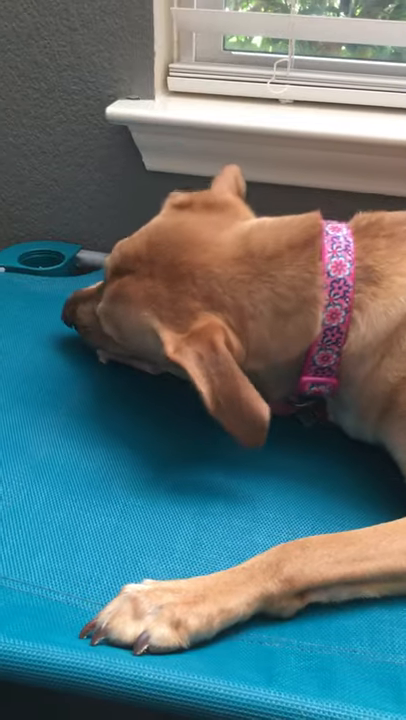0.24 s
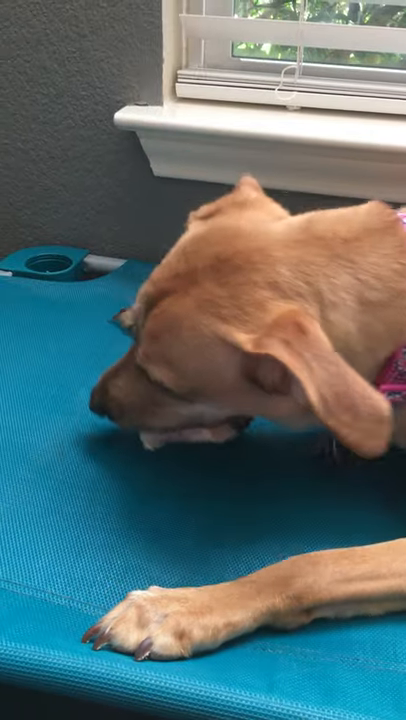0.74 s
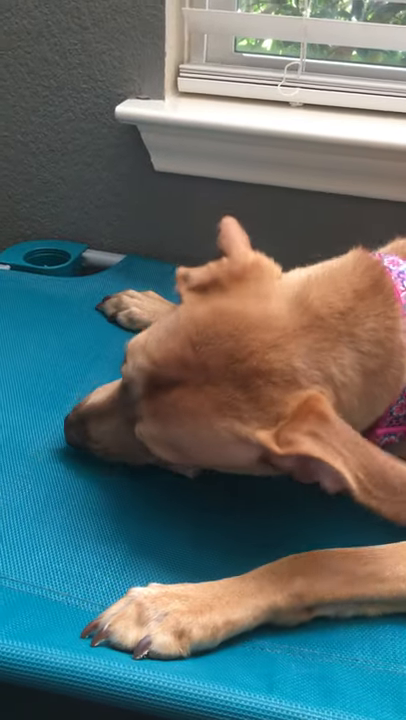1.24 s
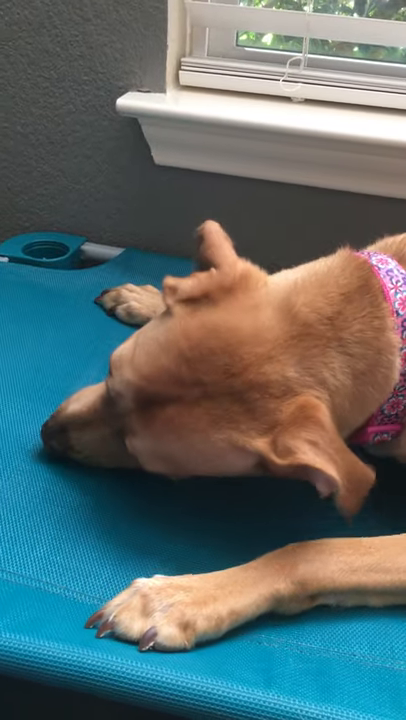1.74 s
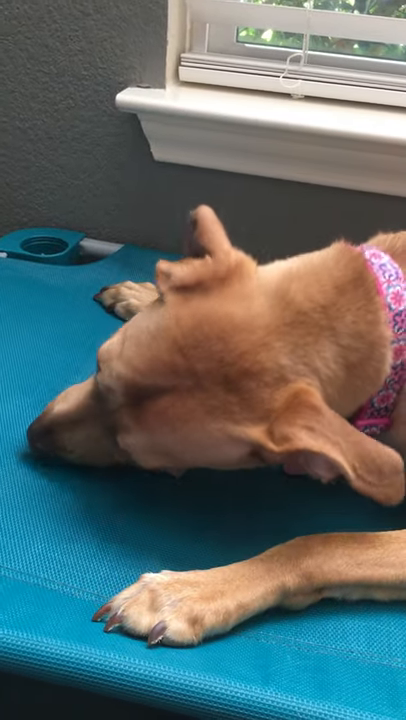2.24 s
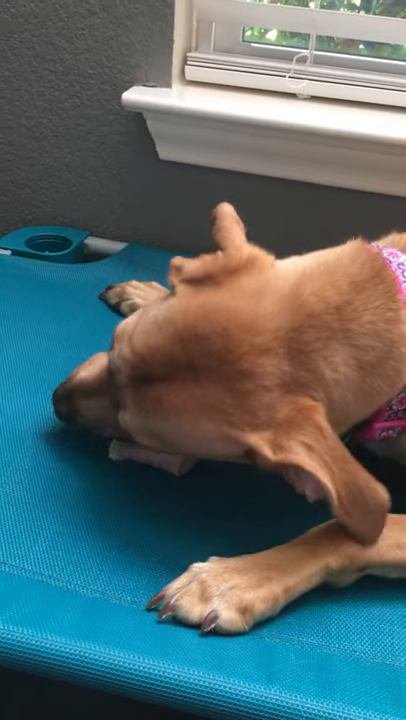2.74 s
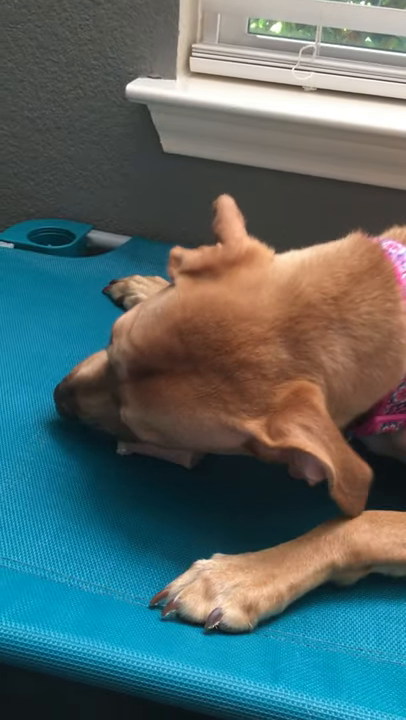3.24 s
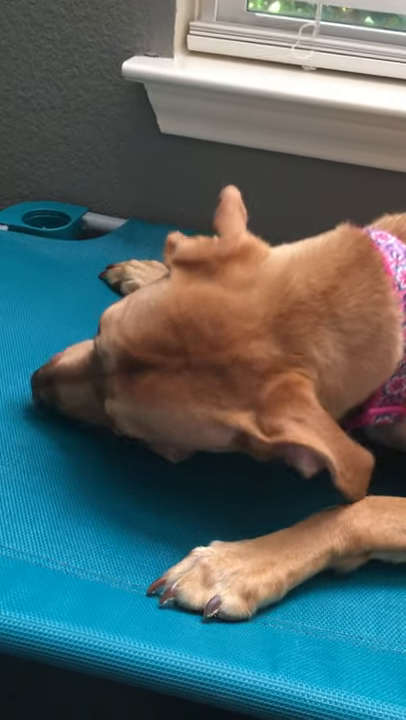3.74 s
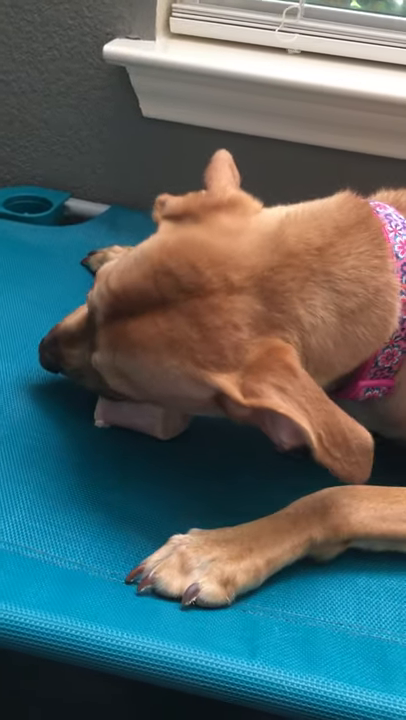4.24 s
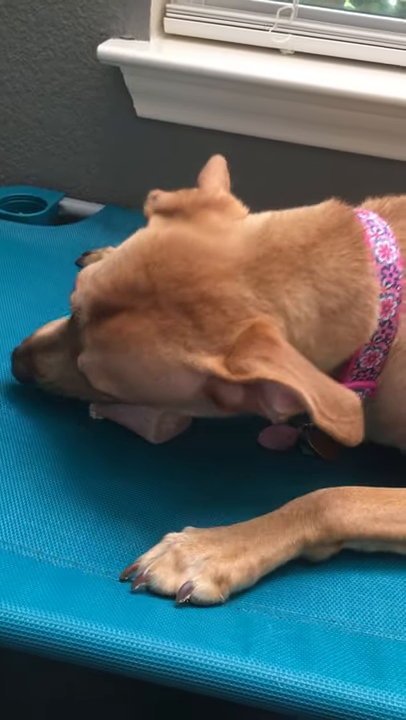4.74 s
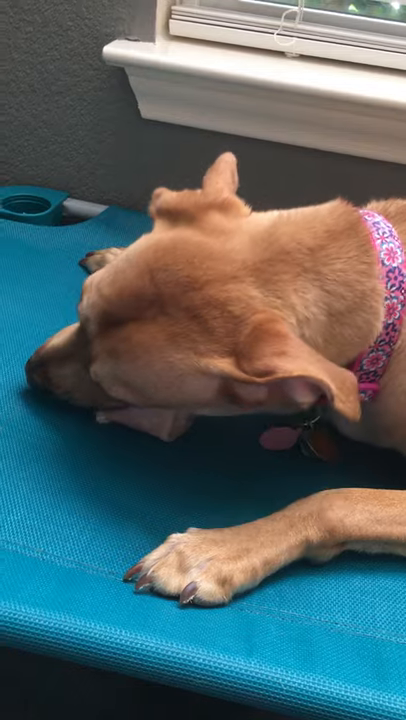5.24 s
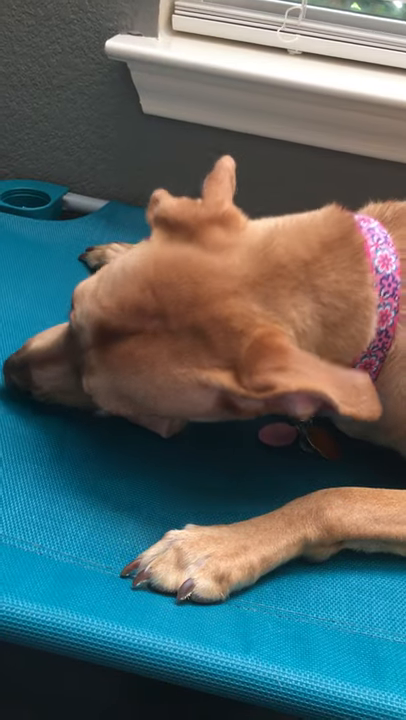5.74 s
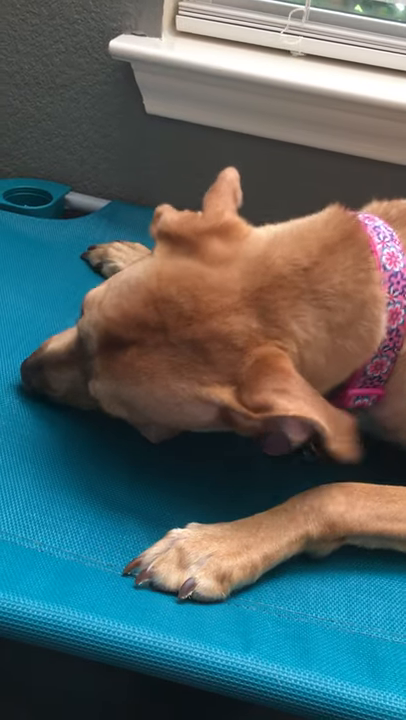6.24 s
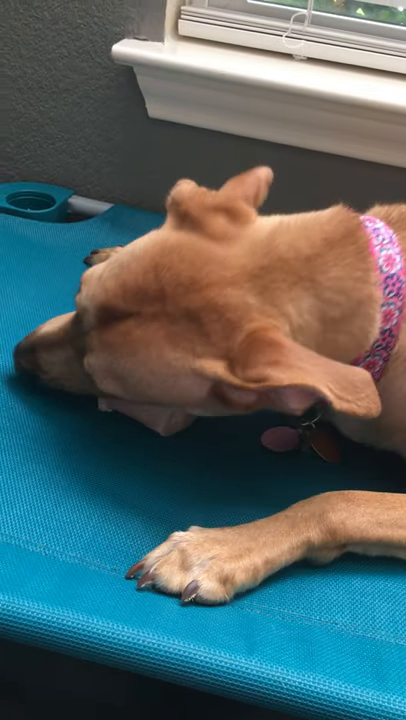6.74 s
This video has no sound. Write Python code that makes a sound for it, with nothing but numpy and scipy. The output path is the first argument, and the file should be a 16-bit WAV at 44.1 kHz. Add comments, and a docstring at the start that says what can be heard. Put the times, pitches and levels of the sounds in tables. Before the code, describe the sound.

Close, irregular bone chewing by a dog: moist pops, dry crunches and a few loud snaps, with thin metallic tag ticks over faint room rumble.

```python
"""In a small room, on a taut fabric cot, a dog gnaws a hollow bone up close.
Each tooth contact layers a wet pop, a dry crunch, a cavity ring and a jaw thud; crumbs add tiny blips.
Shaped noise rubs as jaw, teeth and fur, while collar tags tick and ring as decaying sines.
The cot booms and groans low; contacts and metal echo in the room over a steady rumble and hiss."""
import sys
import numpy as np
from scipy import signal
from scipy.fft import rfft, irfft, next_fast_len
from scipy.io import wavfile
from scipy.ndimage import uniform_filter1d, map_coordinates

SR = 44100
rng = np.random.default_rng(int(sys.argv[2]) if len(sys.argv) > 2 else 0)


def unload_audio(sound):
    """Save the sound as a 16-bit wav file, at the path given as the first command line argument."""
    columns = np.transpose(np.atleast_2d(sound))
    # keep every value between -1 and 1, then stretch to whole-number steps
    steps = np.round(np.clip(columns, -1, 1) * 32767)
    wavfile.write(sys.argv[1], SR, steps.astype(np.int16))


N = 308700  # samples, 7 s


def amp(db):
    """Decibels to gain."""
    return 10 ** (np.asarray(db) / 20)


def unit(x):
    """Scaled to rms 1."""
    return x / np.sqrt(np.mean(x ** 2, axis=-1, keepdims=True) + 1e-20)


def top(rows):
    """Each row scaled to peak 1."""
    return rows / np.abs(rows).max(axis=1, keepdims=True)


def along(points, hz):
    """(frequency, value) points read on a log frequency axis."""
    f, v = np.transpose(points)
    return np.interp(np.log(hz + 1), np.log(f + 1), v)


def filtered(x, response):
    """x shaped by a complex response of frequency, padded so its tail does not wrap."""
    n = x.shape[-1]
    m = next_fast_len(n + 4096)
    return irfft(rfft(x, m) * response(np.fft.rfftfreq(m, 1 / SR)), m)[..., :n]


def peak(f, hz, width_hz):
    """A causal resonance of top gain 1."""
    return 1j * f * width_hz / (hz * hz - f * f + 1j * f * width_hz)


def place(times, rows):
    """Each row starts at its time; overlaps add."""
    at = np.round(times * SR).astype(int)[:, None] + np.arange(rows.shape[1])
    return np.bincount(at.ravel(), rows.ravel(), N + rows.shape[1])[:N]


def wobble(rate):
    """A smooth random curve, rate knots a second."""
    return map_coordinates(rng.standard_normal(N // 100), [np.arange(N) * rate / SR])


# Spectrum of room air and microphone hiss: (frequency [Hz], level per Hz [dB])
HOUSE_SPECTRUM = [(13, -42), (36, -6), (81, -7.5), (123, -14), (162, -22), (181, -21.5), (351, -27),
                  (438, -37.5), (476, -36), (2250, -37.5), (2650, -38), (12500, -46), (16500, -58.5)]
HOUSE_DB = -66  # rms before its slow wobble


def house():
    """Low rumble and hiss: shaped noise whose level drifts a little."""
    noise = filtered(rng.standard_normal(N), lambda f: amp(along(HOUSE_SPECTRUM, f)))
    return amp(HOUSE_DB + 1.7 * wobble(2.5)) * unit(noise)


# Reverberation of the small room: (frequency [Hz], time to fall 60 dB [s])
ROOM_DECAY = [(150, 0.2), (700, 0.43), (3000, 0.42), (8000, 0.35), (16000, 0.25)]


def room(x):
    """Near walls answer first, then each frequency dies at its own speed.

    The echo tail is redrawn at random every quarter second.
    """
    wet, step = np.zeros(N + SR), SR // 4
    for start in range(0, N, step):
        hz, t, z = signal.stft(rng.standard_normal(SR // 2), SR, nperseg=256)
        fade = amp(-60 * t / along(ROOM_DECAY, hz)[:, None])
        tail = signal.istft(z * fade, SR, nperseg=256)[1]
        tail *= 1 + 2.0 * np.exp(-np.arange(len(tail)) / (0.0079 * SR))  # stronger early echoes
        echo = signal.fftconvolve(x[start:start + step], tail / np.linalg.norm(tail))
        wet[start + 150:][:len(echo)] += echo  # first echo after 150 samples
    return wet[:N]


# Low cot booms after hard cracks: (time [s], level before a 5.5 dB lift [dB])
COT_BOOMS = [(1.498, -54), (2.077, -53.5), (2.681, -40), (3.884, -47), (4.913, -53), (5.999, -46.5),
             (6.382, -41)]


def cot():
    """The taut fabric drums low after a hard crack: a softly starting, decaying sine."""
    s, db = np.array(COT_BOOMS).T[:, :, None]
    t = np.arange(SR // 4) / SR
    drum = np.sin(2 * np.pi * 78 * t) * amp(-60 * t / 0.18) * (1 - np.exp(-t / 0.014))
    return place(s[:, 0], amp(db + 5.5) * drum)


# Fabric groans under the jaw: (time [s], length [s], pitch [Hz], level before the swell [dB])
COT_GROANS = [(0.691, 0.098, 356, -59), (0.817, 0.072, 377, -62)]


def groan():
    """Stretching fabric gives a low, slightly unsteady tone: narrow noise that swells and fades."""
    s, length, hz, db = np.array(COT_GROANS).T[:, :, None]
    t = np.arange(SR // 4) / SR
    noise = rng.standard_normal((len(s), len(t)))
    tone = unit(filtered(noise, lambda f: peak(f, hz, 37) ** 2))
    swell = np.sqrt(np.clip(np.sin(np.pi * np.minimum(t / length, 1)), 0, 1))
    return place(s[:, 0], amp(db) * tone * swell)


def rub(spectrum, slips_per_s, slip_db, patchy_db):
    """Patchy friction noise broken by tiny slips of uneven size, rms 1."""
    z = signal.stft(rng.standard_normal(N), nperseg=256)[2]
    field = uniform_filter1d(uniform_filter1d(rng.standard_normal(z.shape), 7, 0), 10, 1)
    noise = signal.istft(z * amp(patchy_db * field / field.std()), nperseg=256)[1][:N]
    slips = (rng.random(N) < slips_per_s / SR) * amp(slip_db * rng.random(N))
    slips = signal.lfilter([1], [1, -np.exp(-1 / (0.0041 * SR))], slips)  # each slip dies in a few ms
    return unit(filtered(noise * (1 + slips), lambda f: amp(along(spectrum, f))))


DIP_HZ, DIP_WIDTH_HZ, DIP_DEPTH = 1404, 570, .75


def dip(f):
    """A fixed dip near 1.4 kHz."""
    return 1 - DIP_DEPTH * peak(f, DIP_HZ, DIP_WIDTH_HZ)


UPPER_DIP_HZ, UPPER_DIP_WIDTH_HZ, UPPER_DIP_DEPTH = 4620, 1800, 0.49


def upper_dip(f):
    """A fixed, wider and shallower dip near 4.6 kHz."""
    return 1 - UPPER_DIP_DEPTH * peak(f, UPPER_DIP_HZ, UPPER_DIP_WIDTH_HZ)


# Gnawing effort: (time [s], rubbing level [dB], fur and collar level before the tag buzz [dB])
GNAWING_EFFORT = [(0, -75.5, -71), (.13, -58, -58), (.3, -68, -79), (.5, -84.5, -80), (.62, -74.5, -70),
                  (.68, -57.5, -64), (1, -66, -55), (1.35, -64, -71), (1.5, -60, -70), (1.75, -77, -80),
                  (1.9, -61, -63.5), (2.3, -65, -73.5), (3.1, -64.5, -70), (3.25, -58.5, -66),
                  (3.4, -66.5, -72), (3.75, -64, -69), (3.88, -46, -65), (4.1, -61.5, -67.5),
                  (4.6, -74, -72), (4.95, -62.5, -69), (5.13, -74.5, -76), (5.25, -66, -74.5),
                  (5.38, -85, -92.5), (5.71, -79.5, -89), (5.75, -70.5, -76), (6, -59.5, -68.5),
                  (6.13, -66.5, -49), (6.3, -71, -73), (6.75, -66, -66.5), (7, -62.5, -72.5)]
DRAG_DB, DRAG_T60_S = -34.5, 0.65  # skid after a crack: start relative to the contact level, fade


def chewing():
    """Effort, skid and fur gain for each sample; every listed crack leaves the teeth skidding."""
    s, *cols = np.transpose(GNAWING_EFFORT)
    effort_db, fur_db = (np.interp(np.arange(N) / SR, s, c) for c in cols)
    bites = np.array(TOOTH_CONTACTS)
    fade_db = -60 * np.arange(SR // 2) / SR / DRAG_T60_S
    skid_power = place(bites[:, 0], amp(bites[:, 1:2] + DRAG_DB + fade_db) ** 2)
    return amp(effort_db), np.sqrt(skid_power), amp(fur_db)


# Balance of teeth: (time [s], level over the effort before grip changes [dB])
TEETH_BALANCE = [(0, -2.5), (.7, -2), (1, 5), (1.4, -4.5), (2, -4.5), (3, -6.5), (3.6, -7), (4.4, -2),
                 (5, -5.5), (5.8, -6), (6.5, 8.5), (7, -10.5)]
# Jaw on fabric, spectrum: (frequency [Hz], level per Hz [dB])
FABRIC_SPECTRUM = [(59, -38.5), (100, -10), (305, -3.5), (352, -6), (485, -7), (730, -16), (1400, -32.5),
                   (1820, -59), (3080, -120)]
# Teeth scraping bone, spectrum: (frequency [Hz], level per Hz [dB])
SCRAPE_SPECTRUM = [(530, -16.5), (900, -0.5), (1160, -7), (2040, -9.5), (4870, -13.5), (5500, -17.5),
                   (7150, -43), (12100, -120)]
# Fur and collar, spectrum: (frequency [Hz], level per Hz [dB])
FUR_SPECTRUM = [(2650, -42.5), (4500, -18), (6950, 5), (11400, -8), (12400, -1.5), (16000, -9.5),
                (16500, -31)]
GRIP_DB, GRIPS_PER_S = 1.5, 7  # depth and knot rate of the changing grip
JAW_DRAG_DB = -5  # share of the skid that reaches the fabric through the jaw
SKID_HZ, SKID_WIDTH_HZ = 2500, 3600  # the skid rattles the stiff wall of the bone
BUZZ_DB, BUZZ_WIDTH_HZ = 6, 40  # the rubbing collar hums in the round tag's main mode


def gnawing():
    """Friction noise of jaw, teeth and fur; the jaw's rubbing also sounds the bone's cavity."""
    effort, skid, fur_gain = chewing()
    grip_db = GRIP_DB * wobble(GRIPS_PER_S)  # the load shifts between jaw and teeth
    teeth_db = np.interp(np.arange(N) / SR, *np.transpose(TEETH_BALANCE)) - grip_db
    jaw = rub(FABRIC_SPECTRUM, slips_per_s=17, slip_db=3.5, patchy_db=3.5)
    jaw = unit(filtered(jaw, lambda f: 1 + 2.0 * peak(f, 710, 120)))  # cavity
    teeth = rub(SCRAPE_SPECTRUM, slips_per_s=54, slip_db=7.5, patchy_db=-0.5)
    rattle = rub(SCRAPE_SPECTRUM, slips_per_s=65, slip_db=2, patchy_db=4.0)
    colour = lambda f: dip(f) * upper_dip(f) * (0.25 + peak(f, SKID_HZ, SKID_WIDTH_HZ) ** 2)
    rattle = unit(filtered(rattle, colour))
    fur = rub(FUR_SPECTRUM, slips_per_s=60, slip_db=13.0, patchy_db=5.5)
    tag_hz = ROUND_TAG_MODES[1][0]
    fur = filtered(fur, lambda f: 1 + amp(BUZZ_DB) * peak(f, tag_hz, BUZZ_WIDTH_HZ))
    jaw_gain = np.hypot(effort * amp(grip_db), skid * amp(JAW_DRAG_DB))
    return jaw_gain * jaw + effort * amp(teeth_db) * teeth + skid * rattle + fur_gain * fur


# The round tag swings against another piece:
# (time [s], tick peak [dB], round tag level [dB], other piece [name], its ring level [dB])
TAG_CONTACTS = [(.02, -49, -83, "clasp", -81.5), (.048, -56, -72, "clasp", -71),
                (.084, -36.5, -53, "wide", -34), (0.094, -26.5, -80, "wide", -31),
                (0.105, -29, -68, "ring", -63), (.149, -35, -42, "clasp", -53),
                (.158, -38.5, -45.5, "wide", -71), (0.172, -31.5, -80, "ring", -48.5),
                (0.22, -37.5, -73, "ring", -73), (.264, -55, -73, "ring", -80),
                (0.335, -41, -84, "ring", -43.5), (.374, -37, -69, "ring", -66.5),
                (0.559, -43, -79, "ring", -72.5), (.674, -46, -59.5, "ring", -72.5),
                (.693, -58, -60, "ring", -80), (.747, -62, -56.5, "clasp", -79),
                (.784, -40.5, -59.5, "ring", -71.5), (.807, -27.5, -50, "wide", -51),
                (.858, -58, -57, "clasp", -74), (.901, -62, -53.5, "ring", -70),
                (.929, -31, -52, "ring", -49.5), (.953, -29.5, -52.5, "ring", -52),
                (0.993, -34, -69, "clasp", -50), (1.007, -51, -68, "clasp", -48),
                (1.046, -53, -74, "clasp", -69), (1.133, -41, -56.5, "wide", -57),
                (1.175, -44.5, -78, "wide", -75), (1.284, -40.5, -57, "clasp", -59.5),
                (1.386, -45, -78, "ring", -78), (1.411, -40.5, -75, "ring", -66.5),
                (1.445, -48, -82, "ring", -80), (1.488, -48.5, -60, "clasp", -63.5),
                (1.519, -46, -82, "ring", -82), (1.589, -51, -73, "ring", -75),
                (1.628, -50, -84, "wide", -77), (1.81, -33.5, -63, "ring", -55),
                (2.392, -40, -68.5, "clasp", -71), (2.461, -38.5, -59.5, "ring", -61.5),
                (2.534, -48, -65, "ring", -75.5), (2.96, -61.5, -64.5, "ring", -80),
                (3.021, -46.5, -45.5, "ring", -63), (3.058, -53, -73, "ring", -75.5),
                (3.096, -56, -59, "ring", -78.5), (3.197, -38.5, -77, "wide", -77),
                (3.213, -41.5, -60.5, "ring", -64.5), (3.236, -39.5, -55, "ring", -64),
                (3.269, -37.5, -69.5, "wide", -61), (3.319, -52, -58.5, "ring", -76.5),
                (3.385, -54.5, -58, "ring", -70), (3.528, -39, -73, "clasp", -78),
                (3.606, -35, -76, "wide", -76), (3.616, -32, -77, "wide", -74),
                (3.762, -32, -65, "ring", -46), (3.804, -34.5, -75, "ring", -63.5),
                (3.869, -48, -54.5, "clasp", -64.5), (3.901, -41, -43, "ring", -59),
                (4.004, -39, -68.5, "ring", -50), (4.13, -71, -59.5, "ring", -79.5),
                (4.18, -28.5, -44.5, "clasp", -84), (4.284, -35, -67, "clasp", -57),
                (4.316, -34, -74, "clasp", -56), (4.636, -43.5, -85, "ring", -75.5),
                (4.703, -59, -61, "ring", -70), (4.849, -41.5, -80, "clasp", -63),
                (4.866, -28.5, -66.5, "ring", -54), (4.928, -33, -47.5, "ring", -62.5),
                (5.004, -44.5, -47, "ring", -56), (5.156, -50.5, -74, "wide", -72),
                (5.236, -47, -72, "ring", -69), (5.803, -52, -77, "wide", -76),
                (5.953, -37.5, -71, "ring", -62.5), (5.989, -29, -57, "ring", -51.5),
                (6.018, -35, -53.5, "clasp", -71.5), (6.073, -27.5, -35, "ring", -39.5),
                (6.116, -32, -83, "wide", -58), (6.154, -30, -66, "ring", -46),
                (6.208, -27, -71, "wide", -53.5), (6.242, -38, -63, "ring", -57),
                (6.253, -33.5, -62.5, "wide", -67), (6.31, -38, -49, "ring", -60),
                (6.367, -46.5, -51, "ring", -58), (6.402, -34.5, -38.5, "ring", -39.5),
                (6.584, -48, -54, "ring", -63), (6.605, -46.5, -55, "clasp", -68),
                (6.737, -41.5, -53.5, "ring", -62), (6.993, -29.5, -66.5, "wide", -70)]
# Tick spectrum: (frequency [Hz], relative level per Hz [dB])
TICK_SPECTRUM = [(3000, -18.5), (5500, -10.5), (7500, 3), (9500, -8.5), (13000, -11), (16000, -6.5)]
# Ringing modes of the four pieces: (frequency [Hz], relative level [dB], 60 dB decay before muting [s])
CLASP_MODES = [(6040, 7.5, 0.052), (6130, 0.5, 0.05)]
WIDE_TAG_MODES = [(7420, -2.5, 0.04), (8000, -7.5, 0.049), (10300, 0, 0.074), (11300, -14.5, 0.1)]
SPLIT_RING_MODES = [(14370, 6, .05), (14680, 0.5, .05)]
ROUND_TAG_MODES = [(6770, -6.5, 0.07), (12067, 6.5, 0.092), (12200, -15.5, 0.043)]
# How each piece rings along when a neighbour is struck: piece [name] to level under the struck one [dB]
SYMPATHY = {"clasp": -17.5, "wide": -9.5, "ring": -10}


def tags():
    """Each contact ticks, rings the round tag and the piece it meets, and stirs the other pieces."""
    s, tick_db, round_db, other, other_db = (np.array(c)[:, None] for c in zip(*TAG_CONTACTS))
    t = np.arange(SR // 6) / SR
    tick = rng.standard_normal((len(s), len(t))) * amp(-60 * t / 0.022)
    tick = filtered(tick, lambda f: amp(along(TICK_SPECTRUM, f)))
    rows = amp(tick_db) * top(tick)
    muted = np.exp(-(t / 0.042) ** 2)  # the swinging metal soon lands on fur again
    levels = [other_db + (other != name) * db for name, db in SYMPATHY.items()] + [round_db]
    pieces = (CLASP_MODES, WIDE_TAG_MODES, SPLIT_RING_MODES, ROUND_TAG_MODES)
    for db, modes in zip(levels, pieces):
        for hz, mode_db, t60 in modes:
            luck = rng.standard_normal((len(s), 2))  # each strike varies level and pitch slightly
            gain = amp(db + mode_db + 1.4 * luck[:, :1] - 60 * t / t60)
            rows += muted * gain * np.sin(2 * np.pi * hz * (1 + 0.00029 * luck[:, 1:]) * t)
    return place(s[:, 0], rows)


GRIT_PER_S, GRIT_DB = 110, 3.5  # rate; least level over the effort
GRIT_HZ, GRIT_CYCLES = 1238, 4  # middle pitch; cycles to fall 30 dB


def grit():
    """Wet crumbs burst between the teeth: short rising blips at chance times, scaled by the effort."""
    luck = rng.random((round(GRIT_PER_S * N / SR), 3))
    s = luck[:, :1] * N / SR
    hz = GRIT_HZ * np.exp(1.3 * (luck[:, 1:2] - .5))
    effort_db = np.interp(s, *np.transpose(GNAWING_EFFORT)[:2])
    db = effort_db + GRIT_DB - 4 * np.log(1 - luck[:, 2:])  # a few are much louder
    cycles = hz * np.arange(SR // 50) / SR
    tone = np.sin(2 * np.pi * cycles * (1 + .015 * cycles))
    blips = tone * amp(-30 * cycles / GRIT_CYCLES) * (1 - np.exp(-cycles))
    return place(s[:, 0], amp(db) * blips)


NIBBLES_PER_S, NIBBLE_DB = 4, 13  # rate; mean level over the effort
NIBBLE_HZ, NIBBLE_CAVITY_HZ = 1720, 720  # middle pop and cavity pitches


def nibbles():
    """Small contacts at chance times, as strong as the effort allows, in the columns of the loud ones."""
    luck = rng.standard_normal((round(NIBBLES_PER_S * N / SR), 6))
    s = rng.random(len(luck)) * N / SR
    db = np.interp(s, *np.transpose(GNAWING_EFFORT)[:2]) + NIBBLE_DB + 3 * luck[:, 0]
    pop_hz = NIBBLE_HZ * np.exp(0.5 * luck[:, 1])
    sharp_db = -14 + 6 * luck[:, 2]
    cavity_hz = NIBBLE_CAVITY_HZ * np.exp(.08 * luck[:, 3])
    cavity_db = -10 + 4 * luck[:, 4]
    thud_db = -12 + 6 * luck[:, 5]
    return np.column_stack([s, db, pop_hz, sharp_db, cavity_hz, cavity_db, thud_db])


def snap(count, t, t60):
    """Noise bursts of even spectrum, the raw material of pop, crunch, edge and thud."""
    fade = amp(-30 * t / t60) * (1 - np.exp(-t / 0.0004))
    z = rfft(rng.standard_normal((count, len(t))) * fade ** 2)
    return irfft(z / np.abs(z), len(t)) * fade ** 0.28  # flattened, then faded gently


def wall_modes(rows):
    """Response of a set of bone modes, alternating in sign."""
    return lambda f: sum((-1) ** k * amp(g) * peak(f, c, w) for k, (c, w, g) in enumerate(rows))


# Tooth contacts; the last three levels are relative to the contact, the cavity's before a 1.47 gain:
# (time [s], contact level [dB], pop pitch [Hz], sharp edge level [dB],
#  cavity pitch [Hz], cavity level [dB], jaw thud level [dB])
TOOTH_CONTACTS = [(.063, -51.5, 1630, 2, 552, -8.5, 4), (.082, -35, 4400, -11, 593, -16, -9.5),
                  (.109, -34.5, 2740, -2, 756, -13, -25), (0.136, -38, 1660, -18, 890, -20, -14),
                  (.171, -38, 3100, -11, 945, 2.5, 0), (.192, -42, 1640, -5, 857, 1.5, -15),
                  (.301, -50, 1460, -2.5, 570, 3.5, 5), (.648, -45, 1550, -10, 1000, -9, -14),
                  (.807, -33, 4940, -4, 720, -38, -30), (.88, -44.5, 1250, -19, 590, -29, -16),
                  (0.95, -44.5, 1560, 11.5, 840, -4, -34), (.995, -43.5, 1160, -20, 890, -27, -28),
                  (1.091, -54.5, 1280, -17, 714, 7, -21), (1.107, -38.5, 1510, -27, 956, -9.5, -15),
                  (1.139, -40.5, 1580, -22, 987, -9.5, -32), (1.23, -33, 3840, -36, 716, -41, -43),
                  (1.312, -46, 1300, -19.5, 700, -10, -18), (1.413, -50, 2720, -32.5, 688, 12, 10.5),
                  (1.462, -52.5, 1490, -20, 708, 10, -12), (1.47, -47, 1530, -23, 690, 12.5, -7),
                  (1.497, -44, 1520, -18, 700, -12, -17), (1.521, -41.5, 1300, -17, 695, -9, -25),
                  (1.575, -44.5, 1300, -20, 700, -17, -25), (1.612, -44, 1250, -16, 715, -23, -15),
                  (1.702, -39.5, 980, -31, 700, -1.5, 1.5), (1.787, -50.5, 1210, -10, 720, -16, -20),
                  (1.87, -42, 1310, -3, 806, -6, -15), (1.918, -37.5, 1270, -18, 710, -13, -18),
                  (1.929, -30, 1700, -37, 692, -2.5, -7), (2.075, -25.5, 2955, -7, 702, 11, -4),
                  (2.152, -57, 1720, -22, 756, 2, -21), (2.217, -41.5, 1290, -13, 695, -13, -20),
                  (2.25, -49, 1280, -20, 740, -2, -17), (2.272, -57, 1200, -20, 423, 3, -3),
                  (2.317, -53, 1960, -19, 685, 3, 5), (2.352, -47, 2270, -15, 700, -20, -21.5),
                  (2.468, -38, 3070, -0.5, 684, -12, -12), (2.515, -53.5, 990, -18, 600, -3, 0),
                  (2.551, -49.5, 1420, 1.5, 950, -10, -17), (2.584, -47, 2040, -7, 793, 1, 2),
                  (2.635, -19, 2750, -37, 754, -7, -15), (2.649, -37, 1200, -20, 755, -15, -10),
                  (2.667, -11.5, 2800, -12, 950, -16, -18), (2.742, -44.5, 1690, -20, 698, 9, 1),
                  (2.921, -58, 1500, -20, 720, 11.5, -15), (2.905, -55.5, 1440, -20, 700, 6, -14),
                  (2.971, -33.5, 2440, -37.5, 770, -11, -33), (3.073, -48, 1640, -27, 720, 4.5, 4),
                  (3.129, -48.5, 2320, -21, 810, -6, 3.5), (3.167, -48, 2630, -23, 725, -24, -22),
                  (3.231, -46.5, 2000, 2, 835, 1, 0), (3.434, -42.5, 3630, -12, 680, -32, -31),
                  (3.471, -42.5, 1250, -7, 694, -9, -21), (3.593, -45.5, 2230, -25, 650, -21, -15),
                  (3.732, -50.5, 1520, 3, 640, 1, -9.5), (3.795, -50.5, 1460, 2, 793, 4.5, -4),
                  (3.818, -40.5, 1250, -6, 780, 3, -24), (3.83, -25, 2530, -25, 778, -6.5, -13),
                  (3.857, -36, 1960, -28, 785, -21, -25), (3.881, -16.5, 1920, -10, 750, -7, -15.5),
                  (3.965, -29, 2280, -11.5, 680, -11, -31), (4.005, -48, 1500, -14, 693, 9, -17),
                  (4.055, -24.5, 1660, -23.5, 721, -5, -25), (4.057, -29.5, 1260, -30, 700, -12, -20),
                  (4.092, -52, 1680, -20.5, 720, 10, -15), (4.166, -13, 2970, -1.5, 703, -3.5, -23),
                  (4.221, -40, 1700, -8.5, 684, 10.5, -13), (4.268, -42.5, 1660, -6.5, 636, -5, -31),
                  (4.287, -34.5, 1640, 3, 677, 4.5, -30), (4.318, -50.5, 1660, -16, 684, 10, -20),
                  (4.365, -30, 1634, -6.5, 675, 6, -16), (4.535, -54.5, 1690, -2, 672, 8.5, 6.5),
                  (4.635, -41.5, 1410, -26.5, 710, -3.5, -13), (4.678, -40, 1880, -25, 710, -12, -34),
                  (4.709, -62.5, 1600, -20.5, 740, 10, -15), (4.734, -42.5, 1280, -16, 770, -14, -13),
                  (4.775, -62.5, 1620, -23, 807, 15.5, -18), (4.848, -39, 4830, -18.5, 673, -40, -19),
                  (4.92, -43.5, 1620, -3, 825, 1.5, -1), (4.956, -54, 1500, -12.5, 786, 5, -6),
                  (4.981, -50.5, 1710, -3, 715, 7.5, 8), (5.018, -60.5, 1500, -15, 715, 8, -2),
                  (5.2, -42.5, 1266, -18, 717, -12, -18), (5.755, -52, 2200, -15.5, 652, -2, -2.5),
                  (5.82, -54.5, 1410, -12, 797, 0, -1), (5.857, -52, 2120, -16, 700, -18, -16),
                  (5.898, -59.5, 1200, -15, 594, -7, -6), (5.923, -58, 1540, -2, 785, 11, -21),
                  (5.953, -48.5, 1420, 0, 799, -22, -25), (5.97, -27.5, 1970, -11.5, 687, -7.5, -11),
                  (5.981, -31, 1464, -9, 705, 1, -4), (6.207, -50, 2080, -5, 670, -1.5, -16),
                  (6.24, -49, 3220, 1, 814, -1.5, 3), (6.283, -41.5, 1960, -27, 680, -4, -1),
                  (6.295, -15.5, 2570, -28, 791, -8, -13.5), (6.346, -21.5, 1930, -18.5, 708, -3, -15),
                  (6.378, -5, 2680, -7.5, 975, -12.5, -23.5), (6.555, -35, 2910, -34, 765, -11.5, -38),
                  (6.595, -46, 1340, -20, 700, -20, -25), (6.642, -55.5, 2200, -20, 750, 6, -20),
                  (6.674, -58, 1300, -20, 560, 5.5, -8), (6.765, -54, 1320, -15, 734, 4, 6),
                  (6.791, -45.5, 1300, -9, 720, -19, -16), (6.81, -53, 1380, -8, 840, 4, 7),
                  (6.945, -55, 2420, -2, 676, 1.5, -3)]
# Bone wall, three crunch modes then the sharp edge: (frequency [Hz], width [Hz], relative level [dB])
BONE_MODES = [(973, 150, 6), (1800, 970, 3.5), (2730, 340, -27.5), (5550, 1200, 4.5), (6400, 1200, 2.5),
              (8900, 1600, -2.5), (13200, 2600, -21)]
CRUNCH_DB, CRUNCH_DULL_DB_PER_OCT = -10.5, -6.5  # crunch under the crack; change as the pop pitch rises
CRUNCH_GROWS = 0.27  # crunch dB gained per dB of crack
POP_WIDTH, POP_WIDENS = 0.43, 0.15  # width over pitch for a mean crack; dB wider per dB of crack
# A freer cavity rings longer: FREE_DB more ring doubles its rise and decay
CAVITY_T60_S, CAVITY_RISE_S, FREE_DB = 0.042, .001, 31


def bone():
    """A tooth slips: a wet pop, a dry crunch in the stiff wall modes, a cavity ring, a jaw thud."""
    contacts = np.vstack([TOOTH_CONTACTS, nibbles()])
    s, db, pop_hz, sharp_db, cavity_hz, cavity_db, thud_db = contacts.T[:, :, None]
    t = np.arange(SR // 8) / SR
    burst = lambda t60: snap(len(s), t, t60)
    tone = lambda hz: np.sin(2 * np.pi * hz * t)
    hardness_db = db - db.mean()
    # a film of saliva tears: a short tone that sags in pitch, fainter in hard cracks, inside narrow noise
    sag = np.sin(2 * np.pi * pop_hz * (.92 * t + 0.00088 * (1 - np.exp(-t / 0.0059))))
    sag *= amp(-60 * t / 0.028) * (1 - np.exp(-t / 0.00015))
    pop_width_hz = POP_WIDTH * amp(POP_WIDENS * hardness_db) * pop_hz
    pop_noise = top(filtered(burst(0.028), lambda f: upper_dip(f) * peak(f, pop_hz, pop_width_hz) ** 2))
    pop = 0.5 * amp(-.3 * hardness_db) * sag + 0.95 * pop_noise
    crunch_modes = wall_modes(BONE_MODES[:3])
    crunch = top(filtered(burst(0.017), lambda f: dip(f) * upper_dip(f) * crunch_modes(f)))
    crunch_db = CRUNCH_DB + CRUNCH_DULL_DB_PER_OCT * np.log2(pop_hz / NIBBLE_HZ)
    crunch_db = crunch_db + CRUNCH_GROWS * hardness_db
    edge = top(filtered(burst(0.02), wall_modes(BONE_MODES[3:])))
    # the air in the marrow cavity needs a moment to start
    free = 2 ** (cavity_db / FREE_DB)
    rise = (1 - np.exp(-t / (CAVITY_RISE_S * free))) ** 2
    cavity = tone(cavity_hz) * amp(-60 * t / (CAVITY_T60_S * free)) * rise
    # the bone wall keeps both the cavity tone and the pop pitch going faintly, a little sharp
    linger = tone(1.02 * cavity_hz) + 0.45 * tone(1.02 * pop_hz)
    cavity += 0.025 * free * linger * amp(-60 * t / 0.2) * (1 - np.exp(-t / 0.0034))
    thud = top(filtered(burst(0.046), lambda f: peak(f, 284, 320) ** 2))
    rows = 0.69 * pop + amp(crunch_db) * crunch + amp(sharp_db) * edge
    rows += 1.47 * amp(cavity_db) * cavity + amp(thud_db) * thud
    return place(s[:, 0], amp(db) * rows)


def scene():
    """Near sources, the room's answer to contacts and metal, and the background floor."""
    hits, metal = bone() + grit(), tags()
    near = hits + metal + cot() + groan() + gnawing()
    echoes = room(amp(-6.0) * hits + amp(-9) * metal)
    return (near + echoes + house())[None]


TOP_HZ = 16100


def record(dry):
    """A steep band limit: nothing passes at or above TOP_HZ."""
    return filtered(dry, lambda f: f < TOP_HZ)


dry = scene()
out = record(dry)
unload_audio(out)
```